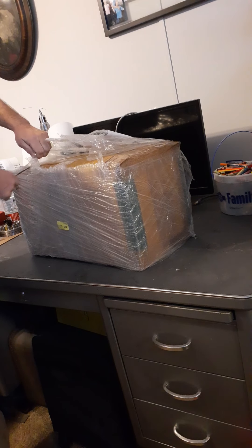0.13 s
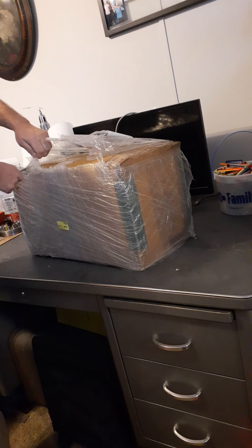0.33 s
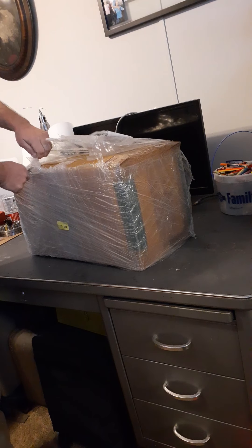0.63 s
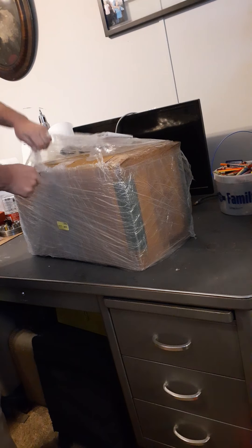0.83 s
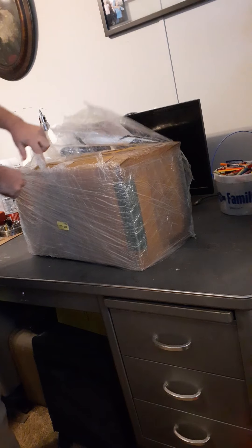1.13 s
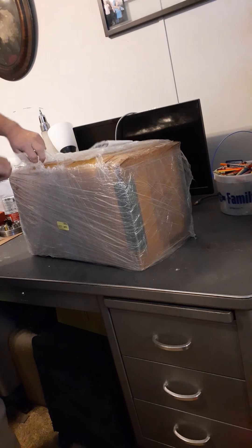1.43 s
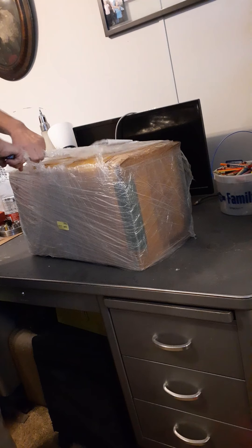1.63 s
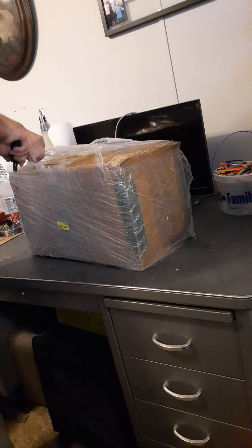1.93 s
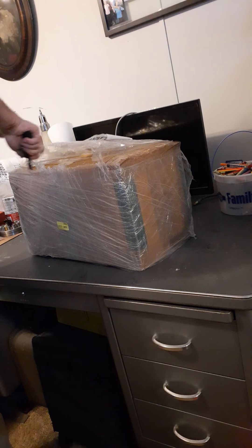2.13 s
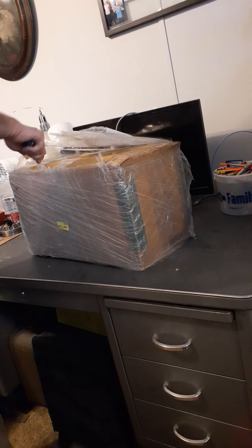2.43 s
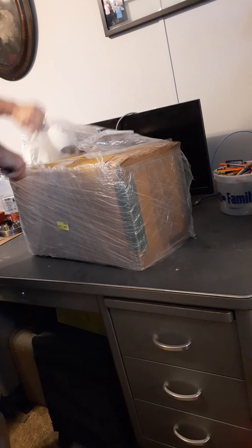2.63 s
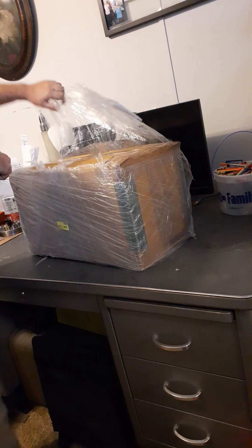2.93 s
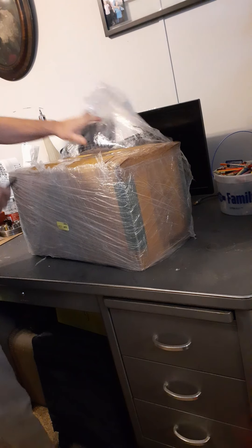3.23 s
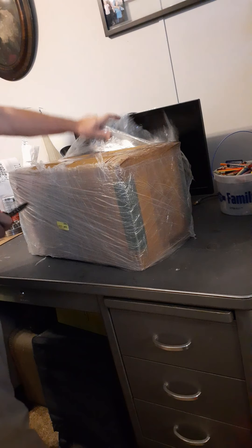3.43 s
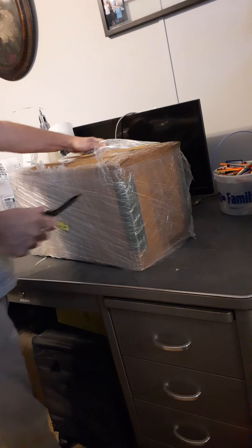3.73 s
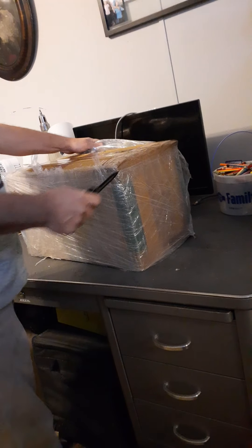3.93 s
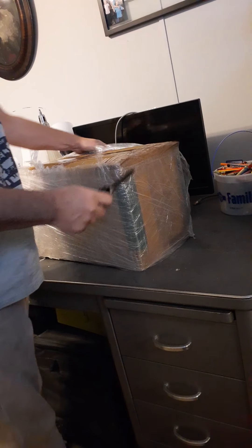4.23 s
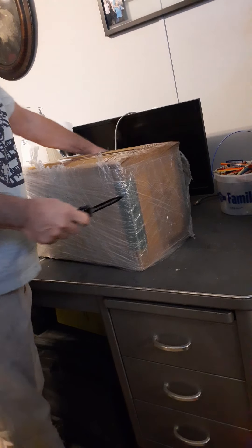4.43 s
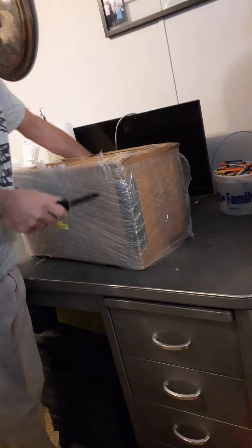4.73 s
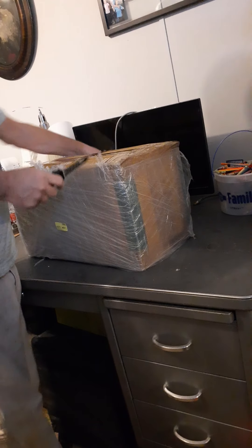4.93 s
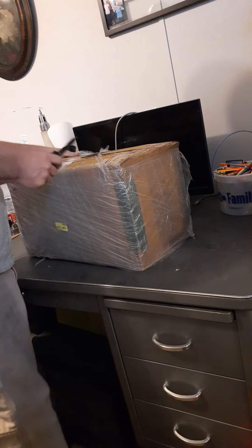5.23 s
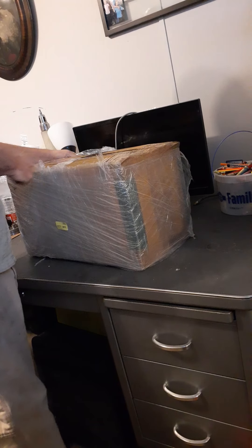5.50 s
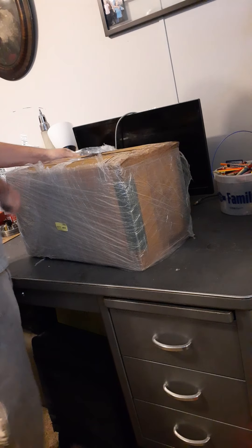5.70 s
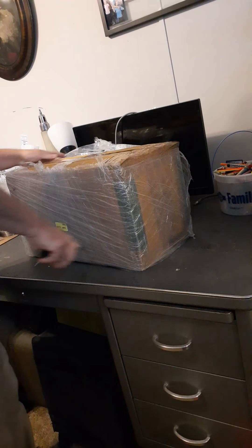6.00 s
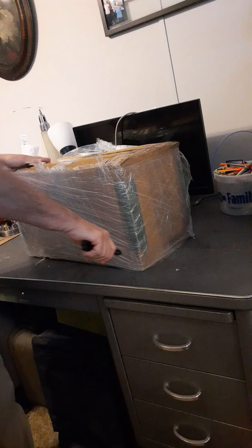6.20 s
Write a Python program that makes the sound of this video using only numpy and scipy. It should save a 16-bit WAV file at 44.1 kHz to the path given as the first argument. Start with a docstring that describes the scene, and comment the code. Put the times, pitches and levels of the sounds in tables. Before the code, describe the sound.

Hands pull and cut plastic stretch wrap off a cardboard box on a desk. Sharp snaps and crackles come quickly in the first second, then a sparser rustle with hollow box knocks, a loud bright ripping burst around 2.6 seconds, more crinkling and snapping to about 5 seconds, then faint rustles. Close phone-like stereo, slightly left, small room with short echo and faint low hum.

```python
"""Hands pull, cut and tear stretch film off a cardboard box, left of a phone in a small room.
Random clicks make the crinkle, sharp noise bursts the snaps where the film lets go. The same pull rasps
on the card walls and drums the hollow box, both banks of resonances; slaps strike the box and a finger
squeaks once on the film. Room echoes, soft noise and a faint motor hum lie behind."""
import sys
import numpy as np
from scipy import signal
from scipy.fft import rfft, irfft, next_fast_len
from scipy.io import wavfile
from scipy.ndimage import map_coordinates

SR = 44100
rng = np.random.default_rng(int(sys.argv[2]) if len(sys.argv) > 2 else 0)


def put_to_file(sound):
    """Save the sound as 16-bit audio at rate SR, in the file named by the first command-line argument."""
    columns = np.atleast_2d(sound).T  # one column per channel
    safe = np.clip(columns, -1, 1)
    whole_steps = np.round(safe * 32767)
    wavfile.write(sys.argv[1], SR, whole_steps.astype(np.int16))


N = 280476

# levels in dB are relative drives unless called rms
# the film lets go: start_s, crack_db, card_share_db (on top of crack_db)
FILM_SNAPS = [(0.068, -29.5, -21), (0.171, -11, -11), (0.212, -32.5, 8), (0.273, -32, 0),
              (0.297, -15.5, -1), (0.381, -29, 10.5), (0.496, -23, -37), (0.6, -16.5, 1), (0.612, -17.5, 5),
              (0.68, -7, -19), (0.712, -18.5, 5), (0.766, -17.5, 6), (0.799, -19, 5.5), (0.839, -6, -8),
              (1.024, -14, -23), (1.264, -17.5, -12), (1.408, -27, -4), (1.813, -37, 0.5),
              (1.639, -26, -0.5), (1.899, -46, -24), (2.152, -16, 1), (2.372, -16, -12.5),
              (2.556, -28, -25), (2.629, -6.5, -4.5), (2.695, -14, -10), (2.711, -8.5, -13),
              (2.745, -8.5, -13), (2.878, -18, -25), (3.328, -18.5, -12), (3.427, -22, -27),
              (3.599, -20, -31), (3.962, -28, -10), (4.089, -22.5, -9), (4.319, -23, 6), (4.433, -16, -27),
              (4.521, -17, -10), (4.591, -9, -11), (4.679, -17.5, -6), (4.831, -30.5, 2), (4.954, -35, -12),
              (5.638, -30, -17), (5.777, -31, -19), (5.803, -20, -22), (5.937, -33, -13),
              (6.088, -24, -17.5)]


def amp(db):
    """dB to gain."""
    return 10 ** (np.asarray(db) / 20)


def unit(x):
    """Scaled to rms 1."""
    return x / np.sqrt(np.mean(x ** 2) + 1e-20)


def along(points, hz):
    """(Hz, value) points read on a log frequency axis."""
    f, v = np.transpose(points)
    return np.interp(np.log(hz + 1), np.log(f + 1), v)


def curves(rows):
    """One value per sample for each column after the time."""
    s, *cols = np.transpose(rows)
    t = np.arange(N) / SR
    return [np.interp(t, s, c, right=c[-1]) for c in cols]


def wobble(knots_per_s):
    """A smooth random curve through normal random knots."""
    knots = rng.standard_normal(int(N * knots_per_s / SR) + 4)
    return map_coordinates(knots, [np.arange(N) * knots_per_s / SR])


def filtered(x, response):
    """x shaped by a complex response of frequency."""
    m = next_fast_len(N + SR // 2)
    hz = np.fft.rfftfreq(m, 1 / SR)
    return irfft(rfft(x, m) * response(hz), m)[..., :N]


def modes(table):
    """Causal response of parallel resonances with alternating signs."""
    def response(f):
        total = 0
        for k, (center_hz, width_hz, db) in enumerate(table):
            loss = 1j * f * width_hz
            total = total + (-1) ** k * amp(db) * loss / (center_hz ** 2 - f ** 2 + loss)
        return total
    return response


def pull():
    """Strength of crinkle, rasp and drumming: tugs swell, hold and let go; loose film fills the gaps."""
    # tugs at the film: full_from_s, swell_s, hold_s, crinkle_db, rasp_db and drum_db (above crinkle)
    tug_rows = [(0.177, .006, 0.053, -53.5, 14, 6), (0.302, 0.0054, 0.0088, -47.5, -5, 10),
                (.36, .02, 0.017, -36, -19, -14), (0.384, .01, 0.012, -36.5, 5, 2),
                (0.501, 0.0083, .04, -42.5, -12, -16), (.57, 0.064, .02, -42.5, 11.5, 2.5),
                (0.603, 0.013, 0.012, -34, 8.5, -4), (.685, 0.013, .065, -31.5, 4, -7.5),
                (0.771, 0.045, 0.12, -32, 6, -0.5), (1.009, 0.074, 0.04, -37.5, -6, -9.5),
                (1.24, 0.22, 0.057, -43.5, -28, -7), (1.412, 0.1, .1, -40.5, -3, -20),
                (1.53, 0.034, 0.19, -39.5, 0.5, -15.5), (1.81, .02, .04, -52, -18, 2),
                (2.06, .06, 0.076, -39, -1.5, -8.5), (2.15, 0.058, 0.11, -29, -1.5, -4.5),
                (2.375, .01, 0.014, -41, -14, -4), (2.565, 0.046, 0.054, -29.5, -4, -34),
                (2.619, 0.11, 0.011, -27, -4.5, -22), (2.71, 0.096, 0.077, -27.5, -9, -8),
                (3.19, 0.076, 0.15, -36.5, -5.5, -16), (3.41, 0.13, 0.064, -30, -6, -9.5),
                (3.488, 0.073, 0.012, -22.5, -2, -12), (3.66, 0.11, .12, -36.5, 2, -11.5),
                (4.095, 0.0071, 0.11, -54.5, 9, -6), (4.298, 0.25, 0.17, -34.5, 0.5, -19),
                (4.595, 0.27, 0.12, -36, -2, -13), (4.88, 0.077, 0.08, -34, 3, -14.5),
                (5.04, 0.086, 0.047, -46.5, 5, -15), (5.27, 0.064, 0.073, -45.5, 7, -2),
                (5.41, 0.24, 0.038, -38.5, -13, -39), (5.645, .01, 0.091, -52.5, -19, -14),
                (5.8, 0.22, 0.022, -41, -10.5, -14), (5.9, 0.071, .19, -47.5, -16, -16),
                (6.2, 0.055, 0.08, -51, -13, -12), (6.33, 0.18, .03, -61.5, 3, 17.5)]
    # loose film rustling between tugs: time_s, level_db
    loose_rows = [(0, -43.5), (.13, -73), (.48, -70), (.9, -35.5), (1.15, -45), (1.95, -54.5), (2.45, -42),
                  (3.05, -46.5), (3.55, -42.5), (4.0, -53), (4.55, -43.5), (5.17, -45.5), (5.5, -51),
                  (5.61, -58), (6.15, -58.5), (6.36, -63)]
    loose_rasp_db, loose_drum_db = -8, -18.5  # above the rustle
    swell_db, fall_db_per_s = 20, 282  # gain over swell_s; rate of letting go
    t = np.arange(N) / SR
    loose_db = curves(loose_rows)[0] + np.array([[0], [loose_rasp_db], [loose_drum_db]])
    power = amp(loose_db) ** 2
    for s, swell_s, hold_s, db, rasp_db, drum_db in tug_rows:
        near = slice(max(round((s - 2 * swell_s) * SR), 0), round((s + hold_s + .25) * SR))
        lack_db = swell_db * np.maximum(s - t[near], 0) / swell_s
        lack_db += fall_db_per_s * np.maximum(t[near] - s - hold_s, 0)
        power[:, near] += amp(db - lack_db + np.array([[0], [rasp_db], [drum_db]])) ** 2
    return np.sqrt(power)


def clicks(per_s, spread_db, clump_db):
    """Random buckles of rms 1: many small, a few large, coming in clumps."""
    chance, size, sign = rng.random((3, N))
    sizes = amp(-spread_db * np.log(size + 0.0019))
    train = (chance < per_s / SR) * sizes * np.sign(sign - .5)
    return unit(train * amp(clump_db * wobble(60)))


def bursts(level_db, spray_t60_s, crack_t60_s):
    """Each snap: a dying spray of smaller buckles (row 0) and a sharp crack (row 1)."""
    spray_db = -17.5  # initial rms, relative to the crack
    out = np.zeros((2, N + SR))
    t = np.arange(SR // 8) / SR
    for (s, *_), db in zip(FILM_SNAPS, level_db):
        spray = unit(rng.laplace(size=len(t))) * amp(spray_db - 60 * t / spray_t60_s)
        crack = amp(-60 * t / crack_t60_s) * np.sign(rng.standard_normal(len(t)))
        out[:, round(s * SR):][:, :len(t)] += amp(db) * np.array([spray, crack])
    return out[:, :N]


def film():
    """Bright crinkle: dense buckles under the pull, plus the snaps; rows rustle, cracks."""
    # film spectrum, overall gain normalized: freq_hz, density_db
    film_colour = [(180, -17), (300, -8), (379, -5), (455, -11.5), (502, -9.5), (978, -6), (2980, -5.5),
                   (12500, -4.5), (16000, -4.5)]
    colour = lambda hz: amp(along(film_colour, hz))
    gain = 1 / np.sqrt(np.mean(colour(np.linspace(0, SR / 2, 999)) ** 2))
    force = bursts(np.transpose(FILM_SNAPS)[1], spray_t60_s=0.037, crack_t60_s=0.0024)
    force[0] += amp(1.5) * pull()[0] * clicks(4000, spread_db=4.0, clump_db=1.5)
    return gain * filtered(force, colour)


def card():
    """Coarser slips of the film on the card, and the snaps, ring the walls; rows rustle, cracks."""
    # wall resonances: center_hz, width_hz, level_db
    card_modes = [(719, 110, 5), (940, 230, -0.5), (1195, 180, -0.5), (1426, 154, 1.5), (1700, 267, 0.5),
                  (2340, 310, 0), (3930, 1560, -7.5)]
    # gain of the two lowest wall resonances: time_s, level_db
    low_wall_rows = [(0, -0.5), (2.5, -1.5), (4.0, -10), (5, -7.5), (6.36, 7.5)]
    _, crack_db, share_db = np.transpose(FILM_SNAPS)
    force = bursts(crack_db + share_db + 15.0, spray_t60_s=0.088, crack_t60_s=0.0036)
    force[0] += amp(5.5) * pull()[1] * clicks(2500, spread_db=4.5, clump_db=1.0)
    low = amp(curves(low_wall_rows)[0]) * filtered(force, modes(card_modes[:2]))
    return low + filtered(force, modes(card_modes[2:]))


def box():
    """Tugs drum the hollow box; slaps strike each of its modes at new strengths."""
    # air and panel resonances: center_hz, width_hz (undamped by the palm), level_db
    box_modes = [(132, 42, -0.5), (179, 18.4, 2.5), (234.4, 23.2, -0.5), (263.3, 24, -1.5), (318, 94, -5.5),
                 (383, 43, -3), (518, 43, -7.5)]
    # a hand or the taut film slaps the box: start_s, strike_db, tilt_db_per_octave
    slap_rows = [(0.299, -32, 5), (0.38, -28, 11), (0.716, -13, -3), (1.263, -14.5, 1.5),
                 (1.286, -18.5, -5.5), (1.522, -27.5, 4), (1.576, -17, -5.5), (1.594, -23.5, -4),
                 (2.155, -15, 2), (2.191, -19.5, -4), (2.629, -15, 8.5), (3.488, -21, 2), (3.822, -20, -10),
                 (4.589, -33, 11), (6.325, -31, 4)]
    palm_damping = 1.15  # the hand on the box shortens the slaps' ring
    onset_s = 0.0059
    tugs = amp(27) * pull()[2] * clicks(2000, spread_db=3.0, clump_db=3.0)
    slaps = np.zeros(N + SR)
    t = np.arange(SR // 6) / SR
    for s, db, tilt_db in slap_rows:
        ring = np.zeros(len(t))
        for hz, width_hz, level_db in box_modes:
            octaves = np.log2(hz / box_modes[1][0])
            mode_db = level_db + tilt_db * octaves + rng.normal(0, 0.78)
            decay = np.exp(-np.pi * width_hz * palm_damping * t)
            ring += amp(mode_db) * decay * np.sin(2 * np.pi * hz * t)
        slaps[round(s * SR):][:len(t)] += amp(db) * ring * (1 - np.exp(-t / onset_s))
    return filtered(tugs, modes(box_modes)) + slaps[:N]


def squeak():
    """A finger's short high stick-slip tone on the film, with a weak octave."""
    pitch_hz, peak_s, level_db = 6720, 0.043, -33
    rise_s, t60_s = 0.007, 0.054
    phase = 2 * np.pi * np.cumsum(pitch_hz + 15 * wobble(25)) / SR
    t = np.arange(N) / SR - peak_s
    shape = np.where(t < 0, np.exp(-(t / rise_s) ** 2), amp(-60 * np.abs(t) / t60_s))
    return amp(level_db) * shape * (np.sin(phase) + amp(-7.5) * np.sin(2 * phase))


def room(x, size=700):
    """Walls answer, unlike at the two ports except in the bass; each piece of x gets a new echo."""
    # decay: freq_hz, t60_s
    room_decay = [(150, 0.13), (1000, 0.16), (5000, 0.17), (15000, 0.14)]
    delay = 60  # samples
    count = N // size + 1
    hz, t, z = signal.stft(rng.standard_normal((count, 2, SR // 9)), SR, nperseg=256)
    alike = (1 / (1 + (hz / 450) ** 2))[:, None]
    z[:, 1] = alike * z[:, 0] + np.sqrt(1 - alike ** 2) * z[:, 1]
    decay = amp(-60 * t / along(room_decay, hz)[:, None])
    tails = signal.istft(z * decay, SR, nperseg=256)[1]
    tails /= np.sqrt(np.mean(np.sum(tails ** 2, axis=2)))
    # each buckle sits elsewhere, so the answer keeps changing
    pieces = np.pad(x, (0, count * size - N)).reshape(count, 1, size)
    out = np.zeros((2, N + SR))
    for k, echo in enumerate(signal.fftconvolve(pieces, tails, axes=2)):
        out[:, k * size + delay:][:, :echo.shape[1]] += echo
    return out[:, :N]


def background():
    """Soft shaped noise, independent at the ports, and a motor hum wavering in pitch and level."""
    # room noise spectrum, overall level normalized: freq_hz, density_db
    air_colour = [(30, 5), (120, -4), (340, -45), (480, -37), (900, -30), (2700, -7.5), (6000, -37),
                  (16000, -7.5)]
    # motor hum: pitch_hz (mean), rms_db (without the wavering)
    hum_tones = [(56, -62.5), (120, -74)]
    noise = rng.standard_normal((2, N))
    air = amp(-56.5) * unit(filtered(noise, lambda hz: amp(along(air_colour, hz))))
    drift = 2 * np.pi * np.cumsum(1 + 0.0307 * wobble(8.1)) / SR
    hum = np.zeros(N)
    for hz, rms_db in hum_tones:
        hum += amp(rms_db + 3 + 2.5 * wobble(8)) * np.sin(hz * drift)  # +3 dB: rms to peak
    return air + hum


def scene():
    """The direct sound reaches the left port first; the room follows."""
    # the left port faces the box: freq_hz, left_minus_right_db
    port_shadow = [(60, 2), (4000, 1.2), (7000, 4), (10000, 7), (16000, 8.5)]
    lead_s = 6 / SR
    rustle, cracks = film() + card()
    near, low = rustle + cracks + squeak(), box()
    # the film lets go on the face turned to the phone, so cracks come straighter than the rustle
    facing = amp(-1) * cracks
    side = np.array([[.5], [-.5]])
    direct = filtered(near + facing + low, lambda hz: np.exp(2j * np.pi * hz * lead_s * side))
    both = amp(-7.5) * direct + room(near) + amp(-13) * room(low, size=8192)
    return filtered(both, lambda hz: amp(side * along(port_shadow, hz))) + background()


def record(dry):
    """The phone cuts the deep bass and keeps nothing above its band limit."""
    top_hz, bass_cut_hz = 15750, 48
    return filtered(dry, lambda hz: (hz < top_hz) / (1 + (bass_cut_hz / (hz + 1)) ** 6))


dry = scene()
out = record(dry)
put_to_file(out)
```